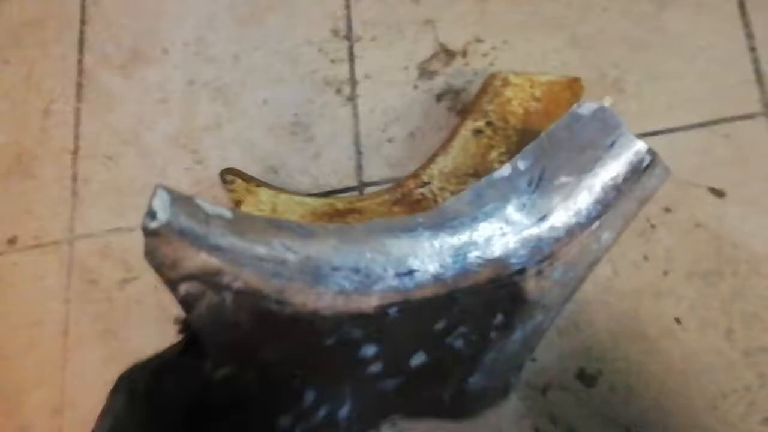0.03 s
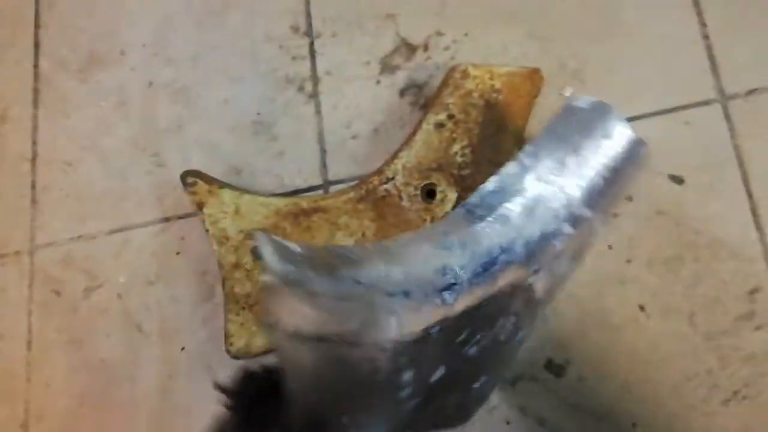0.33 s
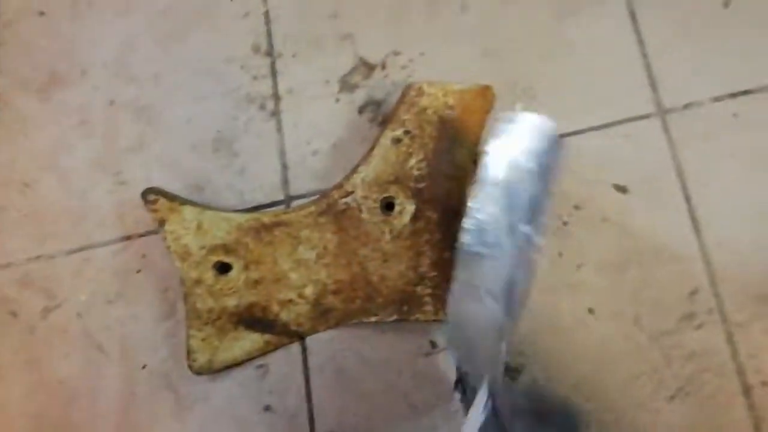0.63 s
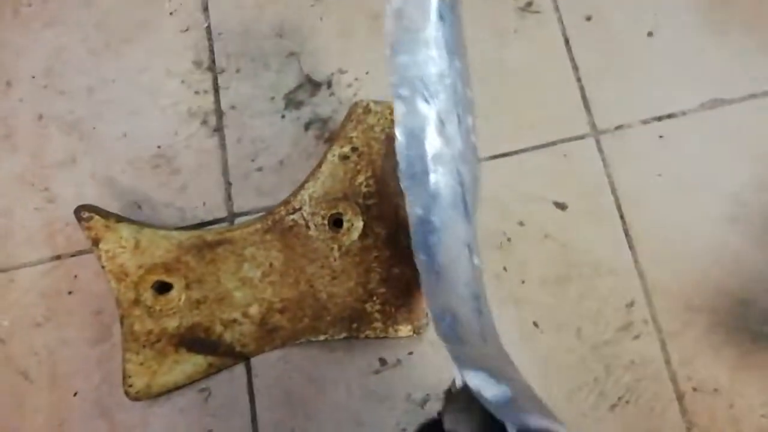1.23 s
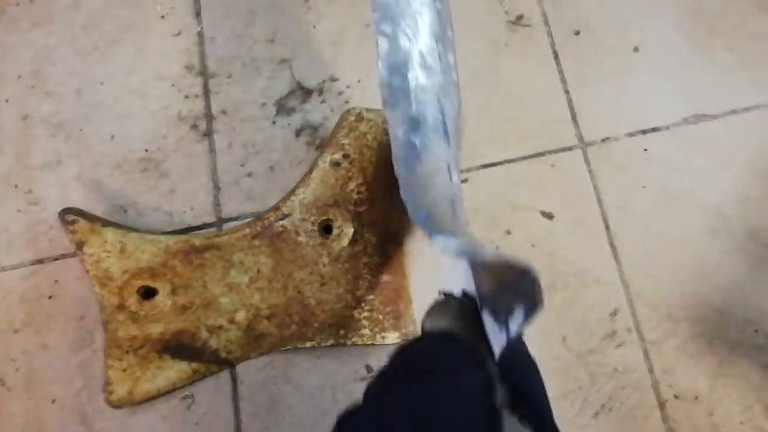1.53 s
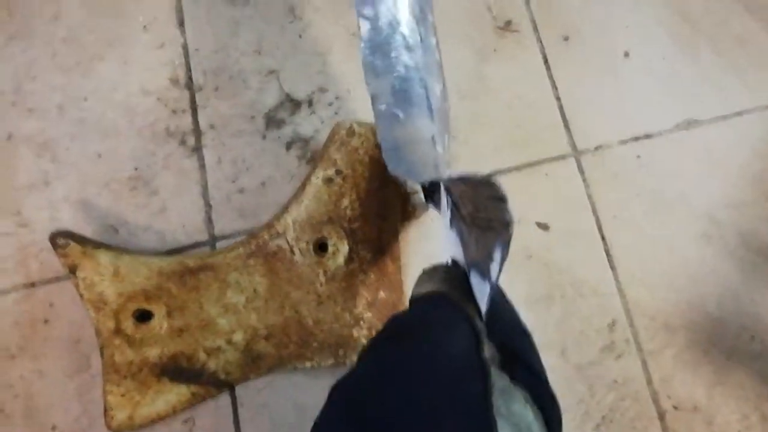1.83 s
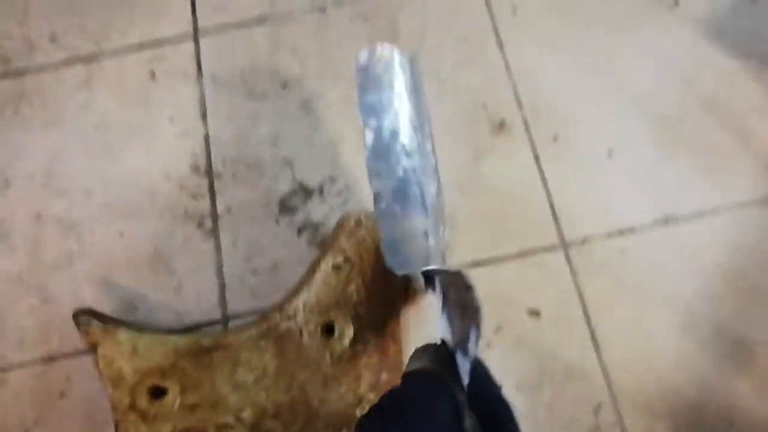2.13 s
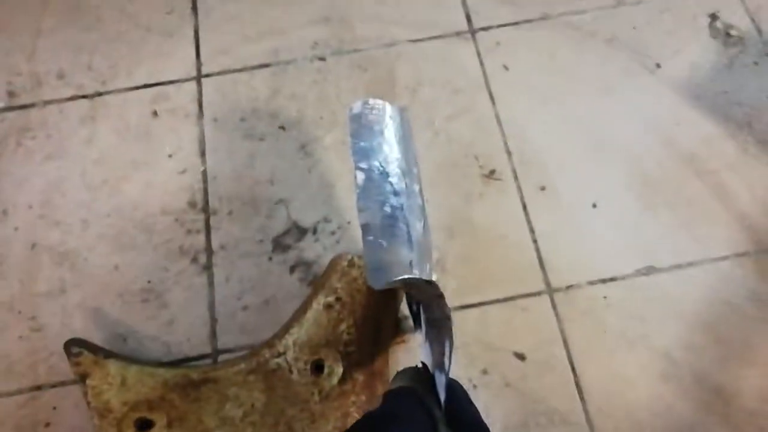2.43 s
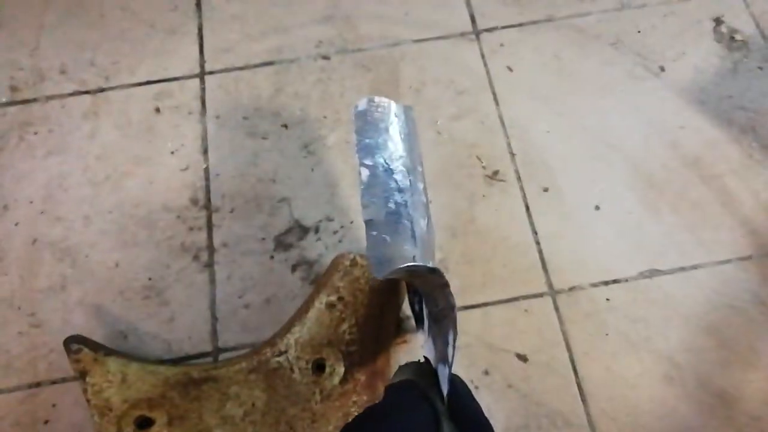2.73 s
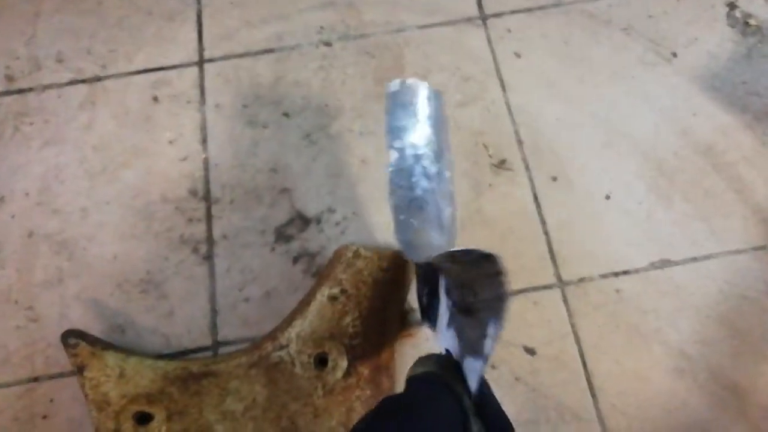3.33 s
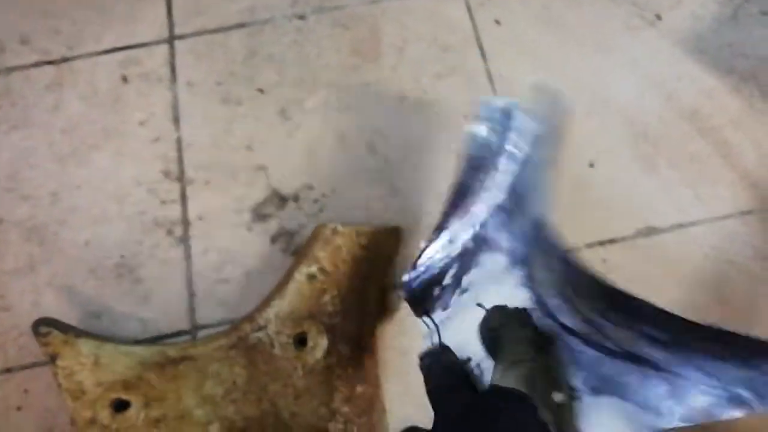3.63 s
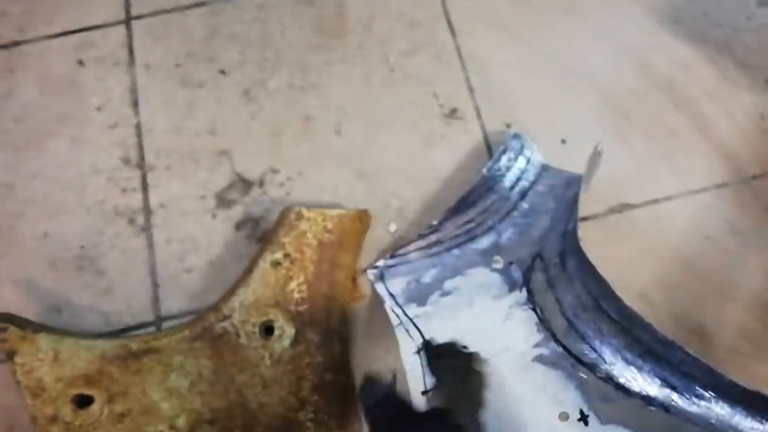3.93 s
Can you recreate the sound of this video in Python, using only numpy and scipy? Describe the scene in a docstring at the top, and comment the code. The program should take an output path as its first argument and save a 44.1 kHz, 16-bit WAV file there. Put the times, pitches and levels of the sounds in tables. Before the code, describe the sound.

A sheet-metal panel lands close by with a knock and a brief ring. From 0.3 to 1.2 seconds it scrapes over tiles and a rusty plate in short, rasping strokes with tiny squeals. A softer slide with a tick fades by 1.8 seconds, leaving faint workshop machinery hum. At 3.5 seconds another scrape builds into a loud, chattering clang at 3.8 seconds.

```python
"""Sheet-metal panel in a workshop.

A curved panel is set down with a dull knock, slid in short strokes over floor tiles and a rusty plate,
left to rest, then swung against the plate with a chattering clang. Blows ring its modes; tiny catches
of the edge rasp and hiss; stick-slip squeals. Hard walls answer, and machinery hums behind."""
import sys
import numpy as np
from scipy import signal
from scipy.fft import rfft, irfft, next_fast_len
from scipy.io import wavfile
from scipy.ndimage import map_coordinates

SR = 44100
rng = np.random.default_rng(int(sys.argv[2]) if len(sys.argv) > 2 else 0)


def wav_record(signal):
    """Record a signal, one row per channel, as 16-bit PCM in the file named by sys.argv[1]."""
    frames = np.transpose(np.atleast_2d(signal))
    bounded = np.clip(frames, -1, 1)
    # unit amplitude maps onto the largest positive 16-bit level
    quanta = np.round(bounded * 32767).astype(np.int16)
    wavfile.write(sys.argv[1], SR, quanta)


N = 176400

# Panel modes: freq_hz, t60_s, scraped_db, knocked_db, struck_db, lean_db (left minus right)
PANEL_MODES = [(1249, 0.42, -24, -6, -27, 12), (1275, 0.55, -36, -30, -18, 3),
               (1323, 0.4, -36, -30, -23, 0), (1491, 0.28, -29, -12, -23, -9),
               (1825, 0.35, -28, -33, -14, -2), (2045, 0.35, -21, -22, -17, 5),
               (2090, 0.16, -17, -25, -24, 8), (2272, 0.3, -37, -39, -18, 3),
               (2383, 0.35, -37, -33, -13, 6), (2433, 0.45, -29, -32, -22, 9),
               (2677, 0.3, -21, -23, -20, 11), (2817, 0.2, -22, -17, -15, 8),
               (2928, 0.25, -16, -28, -17, 9), (3025, 0.3, -29, -33, -14, 12),
               (3100, 0.33, -34, -31, -21, 11), (3312, 0.25, -39, -30, -23, 12),
               (4250, 0.2, -33, -29, -25, 7), (5843, 0.33, -36, -45, -28, -2),
               (6525, 0.5, -32, -23, -37, -11), (7111, 0.4, -40, -50, -30, -12)]
# Slide envelopes, one per stroke, and the settling after the knock: time_s, mid_db, hiss_db
STROKES = [
    [(0.27, -84, -61), (0.314, -52, -51), (0.372, -40, -32.5), (0.44, -45.5, -38.5), (0.54, -53.5, -53.5),
     (0.558, -48.5, -47.5), (0.65, -68, -58)],
    [(0.65, -56, -56), (0.692, -35.5, -37.5), (0.712, -50.5, -50), (0.75, -21, -21.5), (0.78, -42.5, -57),
     (0.894, -71, -72), (0.94, -54, -62)],
    [(0.95, -77, -60.5), (0.958, -50, -63), (0.978, -30.5, -34), (1.074, -36, -35.5), (1.19, -65, -78)],
    [(1.2, -79, -70), (1.25, -52, -45.5), (1.274, -50.5, -47), (1.506, -49, -43.5), (1.652, -53, -49),
     (1.77, -74, -80)],
    [(3.41, -88, -79), (3.484, -55.5, -58), (3.55, -62, -63), (3.682, -30.5, -35.5), (3.69, -25.5, -42.5),
     (3.78, -68, -62)],
]
SETTLING = [(0.055, -35.5, -48), (.1, -36.5, -53), (.18, -46, -48.5), (.2, -72, -74)]
# Resonances of the upright edge on the plate and of a corner on the tiles: freq_hz, level_db
EDGE = [(1690, -22), (1850, -25), (2090, -10.5), (2680, -21), (2810, -17), (2925, -15), (3170, -18),
        (3640, -21.5), (4010, -22.5), (4300, -28), (5270, -24), (5500, -17), (5600, -19), (5700, -20),
        (6500, -23), (6900, -26)]
CORNER = [(930, -27), (1280, -24), (1700, -24), (2115, -14.5), (2470, -22), (2770, -12.5), (3230, -20),
          (3910, -22.5), (5300, -24), (7000, -24)]
# Panel hold for the settling, then each stroke:
# resonances, edge_db, edge_tilt_db_per_oct, ring_db, rasp_db, rasp_tilt_db_per_oct
HOLDS = [(CORNER, -5, 1, 0, 1.5, -3), (CORNER, -3, 3, -6, 4, 3.5), (EDGE, 7, 1.5, -1, -2, .5),
         (EDGE, 6.5, 1, 1, -4, -2), (EDGE, 9.5, -.3, 6, 2.5, -2), (CORNER, 3, 0, -6, -3, -1.5)]
# Stick-slip squeals: centre_s, sigma_s, pitch_hz, level_db
SQUEALS = [(0.503, 0.04, 2925, -50.5), (0.746, 0.0094, 2090, -31), (0.83, 0.02, 3620, -50),
           (0.983, 0.01, 2920, -35.5), (1.064, 0.024, 2920, -30.5)]
# Contacts of the knock, the clang and the catches on rust and joints: start_s, level_db
KNOCK_HITS = [(.0508, -6), (.0535, 0.5)]
CLANG_HITS = [(3.7961, 3), (3.7992, -2), (3.8021, 1), (3.807, -4), (3.8144, 0), (3.8192, -5), (3.826, -5),
              (3.839, -6), (3.8635, -12), (3.869, -10)]
TICK_HITS = [(0.183, -28), (0.9601, -8.5), (1.512, -16.5), (2.279, -37), (3.492, -35)]
# Contact spectra: freq_hz, relative_db
RASP_SPECTRUM = [(60, -72), (300, -15.5), (600, -12.5), (1000, -16), (1500, 1.5), (2900, 2), (4400, -8.5),
                 (6000, 1), (7800, -13), (10000, -11.5), (15000, -24.5)]
HISS_SPECTRUM = [(400, -45), (3000, -12.5), (7500, -11), (9000, -9.5), (10500, -7), (12200, 0),
                 (13500, 0.5), (14600, 4), (15100, 6.5), (15700, -1)]
KNOCK_SPECTRUM = [(100, -23), (400, -19), (560, -2.5), (720, 2.5), (850, -4.5), (1080, 2.5), (1750, -5.5),
                  (2300, -12.5), (3100, -2), (4300, -35), (5200, -13), (8000, -43), (14500, -23.5)]
CLANG_SPECTRUM = [(150, -37), (480, -17.5), (750, -7.5), (1050, -6.5), (1350, -1), (2000, -0.5),
                  (2800, -1.5), (4000, -7), (4900, -13), (6200, -8), (8500, -19.5), (11000, -14),
                  (14800, -6.5), (16000, -6)]
TICK_SPECTRUM = [(200, -31), (600, -5.5), (2500, -10), (4700, -9), (8000, -16), (15000, -11.5)]
# Decay of the room and the panel's dense upper modes: freq_hz, t60_s
WASH_DECAY = [(200, 0.21), (1500, 0.38), (6000, 0.45), (10000, 0.33), (15000, 0.14)]
# Panel stereo balance: freq_hz, lean_db
PANEL_LEAN = [(200, 2.5), (700, 7.5), (1500, 0.5), (3000, 5.5), (5500, 0.5), (7000, -15), (9000, 8.5),
              (11500, 15), (15000, 26.5)]
# Machinery noise spectrum: freq_hz, relative_db
RUSH_SPECTRUM = [(25, -17.5), (45, -20), (68, -15.5), (85, -8.5), (110, -9), (150, -7), (185, -7),
                 (225, -1), (270, -13.5), (500, -18), (620, -28.5), (790, -18), (1200, -18.5), (1700, -24),
                 (3000, -28), (4500, -32.5), (6500, -31), (8800, -45.5), (15500, -41.5)]
# Machinery left-right likeness: freq_hz, correlation
MACHINE_CORRELATION = [(100, 0.99), (220, 0.92), (400, 0.13), (800, 0.11), (2000, -0.17), (4000, -0.012)]
# Machinery noise balance: freq_hz, lean_db
RUSH_LEAN = [(1000, -0.5), (3500, -3), (5000, -3), (6800, -15.5), (8000, -7), (9500, -1.5), (15000, 4)]
# Machinery tones: freq_hz, relative_db, lean_db
HUM_TONES = [(108.6, -65, 0.5), (200, -61, 1), (497, -73.5, 7), (802.6, -67, -5.5), (1200, -72.5, -16),
             (1475, -73, 6), (1694, -70.5, -20)]

RASP_GAIN_DB, HISS_GAIN_DB, RUSH_GAIN_DB, HUM_GAIN_DB = -6.5, 1.5, -54.5, 2.5
GRIT_PER_S, GRIT_SPREAD_DB, JUDDER_DB, JUDDER_PER_S = 7300, 1, 1.5, 130
EDGE_T60_S, WASH_BUILD_S, RIGHT_LAG_S = 0.059, 0.00077, 0.00022
FLEX_S, FLEX_PER_S = 0.00006, 20


def blow(hits, spectrum, modes_db, t60_s, gain_db, wet_db):
    """The first hit rings the panel; it and each bounce of the edge add a crack and wash."""
    out = np.zeros((2, N))
    add(out, hits[0][0], panel_ring(modes_db))
    for start_s, db in hits:
        add(out, start_s, amp(gain_db + db) * contact(spectrum, t60_s, wet_db))
    return out


def panel_ring(levels_db):
    """Free panel modes: decaying sines, levelled by energy."""
    t = np.arange(SR * 3 // 4) / SR
    ear_s = ear_times(t)
    attack = 1 - np.exp(-ear_s / 0.0014)
    out = np.zeros((2, len(t)))
    for (hz, t60_s, *_, lean_db), db in zip(PANEL_MODES, levels_db):
        phase = 2 * np.pi * hz * ear_s + rng.uniform(0, 2 * np.pi)
        mode = np.sin(phase) * amp(-60 * ear_s / t60_s) * attack
        out += amp(db) * sides(lean_db)[:, None] * mode / np.linalg.norm(mode[0])
    return out


def contact(spectrum, t60_s, wet_db):
    """Response to one touch: a noise crack, late on the right, then the wash of room and dense modes."""
    t = np.arange(SR // 2) / SR
    noise = rng.standard_normal((3, len(t))) * amp(-60 * t / t60_s)
    crack = noise[0] + noise[1:]  # common part plus one per ear
    crack[1] = np.pad(crack[1], (round(RIGHT_LAG_S * SR), 0))[:len(t)]
    hz, frame_s, bins = signal.stft(rng.standard_normal((2, len(t))), SR, nperseg=256)
    decay = amp(-60 * frame_s / along(WASH_DECAY, hz)[:, None])
    wash = signal.istft(bins * decay, SR, nperseg=256)[1][:, :len(t)]
    wash *= 1 - np.exp(-t / WASH_BUILD_S)
    direct = unit_energy(coloured(crack, spectrum))
    diffuse = unit_energy(coloured(wash, spectrum))
    return unit_energy(direct + amp(wet_db) * diffuse)


def scrapes(modes_db):
    """In each slide, grit rasps, hisses and rings the touching edge and the whole panel."""
    out, coarse, fine = np.zeros((2, N)), grit(), grit()
    modes = panel_ring(modes_db)
    for stroke, hold in zip([SETTLING, *STROKES], HOLDS):
        resonances, edge_db, edge_tilt, ring_db, rasp_db, rasp_tilt = hold
        time_s, mid_db, hiss_db = np.transpose(stroke)
        span = np.arange(int(time_s[0] * SR), int(time_s[-1] * SR))
        force = coarse[span] * amp(np.interp(span / SR, time_s, mid_db))
        rub = fine[span] * amp(np.interp(span / SR, time_s, hiss_db))
        tilted = [(hz, db + rasp_tilt * np.log2(hz)) for hz, db in RASP_SPECTRUM]
        rasp = drive(force, contact(tilted, t60_s=0.052, wet_db=1))
        edge = flexed(drive(force, edge_ring(resonances, edge_tilt)))
        hiss = drive(rub, contact(HISS_SPECTRUM, t60_s=0.016, wet_db=-17))
        add(out, time_s[0], amp(edge_db) * edge)
        add(out, time_s[0], amp(ring_db) * drive(force, modes))
        add(out, time_s[0], amp(RASP_GAIN_DB + rasp_db) * rasp)
        add(out, time_s[0], amp(HISS_GAIN_DB) * hiss)
    return out


def grit():
    """Dense, clumped catches of the edge on rust and tile; unit rms."""
    caught = rng.random(N) < GRIT_PER_S / SR
    sizes = rng.choice([-1, 1], N) * amp(GRIT_SPREAD_DB * rng.standard_normal(N))
    force = caught * sizes * amp(JUDDER_DB * wobble(JUDDER_PER_S))
    return force / np.sqrt(np.mean(force ** 2) + 1e-20)


def edge_ring(resonances, tilt_db_per_oct):
    """Damped resonances of the touching part, levelled by energy."""
    ear_s = ear_times(np.arange(SR // 2) / SR)
    envelope = amp(-60 * ear_s / EDGE_T60_S) * (1 - np.exp(-ear_s / 0.0023))
    envelope *= np.sqrt(2) / np.linalg.norm(envelope[0])
    out = np.zeros_like(ear_s)
    for hz, db in resonances:
        gains = amp(db + tilt_db_per_oct * np.log2(hz / 3000)) * sides(along(PANEL_LEAN, hz))
        out += gains[:, None] * envelope * np.sin(2 * np.pi * hz * ear_s + rng.uniform(0, 2 * np.pi))
    return out


def flexed(pair):
    """The sliding sheet bends, so its resonances wander slightly in pitch."""
    n = pair.shape[1]
    position = np.arange(n) + FLEX_S * SR * wobble(FLEX_PER_S)[:n]
    return np.array([map_coordinates(side, [position]) for side in pair])


def squeals():
    """Brief rough tones: the edge sticks and slips in step with one mode."""
    t, out = np.arange(N) / SR, np.zeros((2, N))
    for centre_s, sigma_s, hz, db in SQUEALS:
        phase = 2 * np.pi * hz * ear_times(t) + 0.7 * wobble(150)
        out += amp(db) * np.exp(-((t - centre_s) / sigma_s) ** 2 / 2) * np.sin(phase)
    return out * sides(lean_db=26)[:, None]


def machinery():
    """Background machines: a low steady rush and a few wavering tones."""
    def width_rad(hz):
        return np.arccos(np.clip(along(MACHINE_CORRELATION, hz), -1, 1)) / 2

    def mid_side_gains(hz):
        return amp(along(RUSH_SPECTRUM, hz)) * np.array([np.ones_like(hz), np.tan(width_rad(hz))])

    mid, side = filtered(rng.standard_normal((2, N)), mid_side_gains)
    rush = np.array([mid + side, mid - side]) / mid.std()
    rush = filtered(rush, lambda hz: sides(along(RUSH_LEAN, hz)))
    t, hum = np.arange(N) / SR, np.zeros((2, N))
    for hz, db, lean_db in HUM_TONES:
        waver_rad = wobble(38)
        drift_rad = width_rad(hz) * np.array([wobble(1.57), wobble(2.27)])
        swell_db = 1.3 * wobble(6.47)
        tone = np.sqrt(2) * np.sin(2 * np.pi * hz * t + waver_rad + drift_rad)
        hum += amp(db + swell_db) * tone * sides(lean_db)[:, None]
    return amp(RUSH_GAIN_DB) * rush + amp(HUM_GAIN_DB) * hum


def coloured(pair, spectrum, size=32768):
    """Minimum-phase filter: the spectrum with the panel's stereo balance."""
    hz = np.fft.rfftfreq(size, 1 / SR)
    cepstrum = irfft(np.log(amp(along(spectrum, hz)) * sides(along(PANEL_LEAN, hz))))
    cepstrum[:, 1:size // 2] *= 2
    cepstrum[:, size // 2 + 1:] = 0
    return irfft(rfft(pair, size) * np.exp(rfft(cepstrum)))[:, :pair.shape[1]]


def filtered(x, response):
    """Zero-phase filter with gain response(hz)."""
    n = x.shape[-1]
    size = next_fast_len(n + SR // 5)
    return irfft(rfft(x, size) * response(np.fft.rfftfreq(size, 1 / SR)), size)[..., :n]


def drive(force, response):
    """Mono force through a stereo impulse response."""
    return signal.fftconvolve(force[None], response, axes=1)


def amp(db):
    """Decibels to gain."""
    return 10 ** (np.asarray(db) / 20)


def unit_energy(pair):
    """Stereo pair scaled to mid energy 1."""
    return pair / np.linalg.norm(pair.mean(0))


def along(points, hz):
    """Interpolate (freq_hz, value) points on a log axis."""
    freq_hz, values = np.transpose(points)
    return np.interp(np.log(hz + 1), np.log(freq_hz + 1), values)


def wobble(knots_per_s):
    """Smooth random curve."""
    knots = rng.standard_normal(int(N * knots_per_s / SR) + 4)
    return map_coordinates(knots, [np.arange(N) * knots_per_s / SR])


def sides(lean_db):
    """Left and right gains, mean 1."""
    gains = amp(np.array([lean_db, -lean_db]) / 2)
    return gains / gains.mean(0)


def ear_times(t):
    """Left and right time axes, the right delayed."""
    return np.maximum(t - np.array([[0], [RIGHT_LAG_S]]), 0)


def add(track, start_s, sound):
    """Mix a sound into the track."""
    part = track[:, round(start_s * SR):][:, :sound.shape[1]]
    part += sound[:, :part.shape[1]]


def scene():
    """Knock, strokes with ticks and squeals, then the clang, over machinery."""
    scraped_db, knocked_db, struck_db = np.transpose(PANEL_MODES)[2:5]
    knock = blow(KNOCK_HITS, KNOCK_SPECTRUM, knocked_db + 5, t60_s=0.017, gain_db=0, wet_db=-9)
    clang = blow(CLANG_HITS, CLANG_SPECTRUM, struck_db + 20, t60_s=0.009, gain_db=5, wet_db=0.5)
    ticks = sum(blow([(start_s, 0)], TICK_SPECTRUM, scraped_db + db + 15.5,
                     t60_s=0.015, gain_db=db, wet_db=3.5) for start_s, db in TICK_HITS)
    return knock + clang + ticks + scrapes(scraped_db) + squeals() + machinery()


def record(dry):
    """Steep low-pass band limit."""
    cutoff_hz, slope_hz = 15850, 90
    return filtered(dry, lambda hz: (1 - np.tanh((hz - cutoff_hz) / slope_hz)) / 2)


dry = scene()
out = record(dry)
wav_record(out)
```